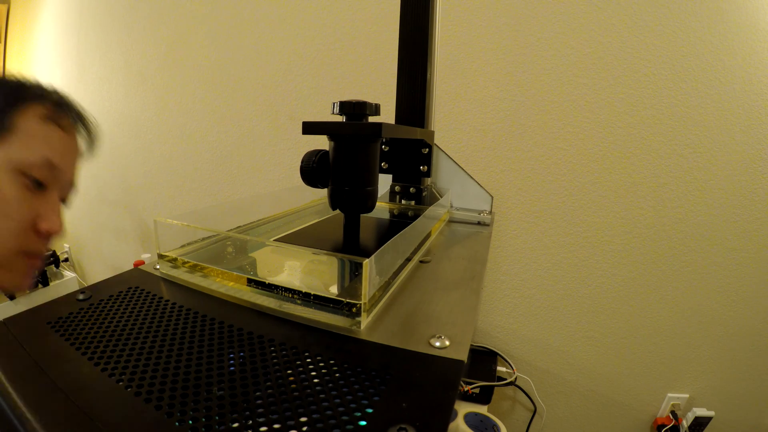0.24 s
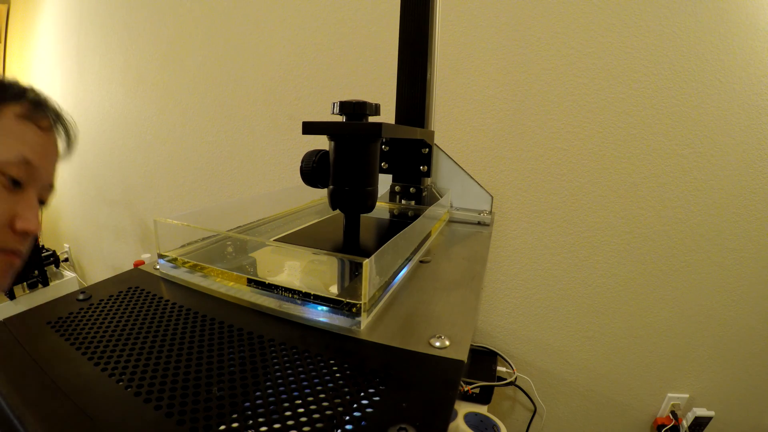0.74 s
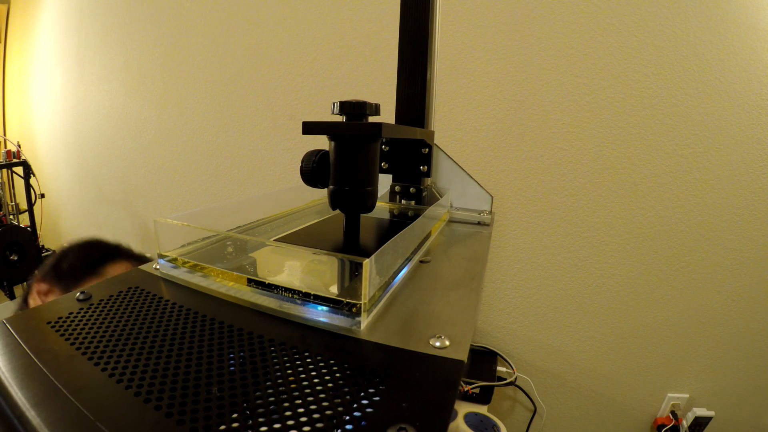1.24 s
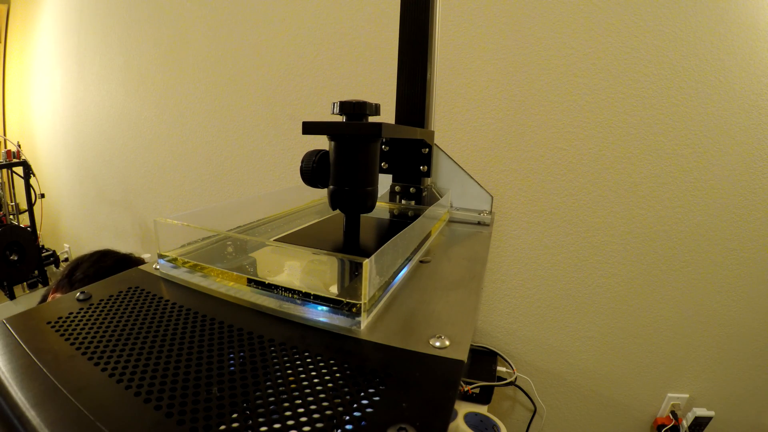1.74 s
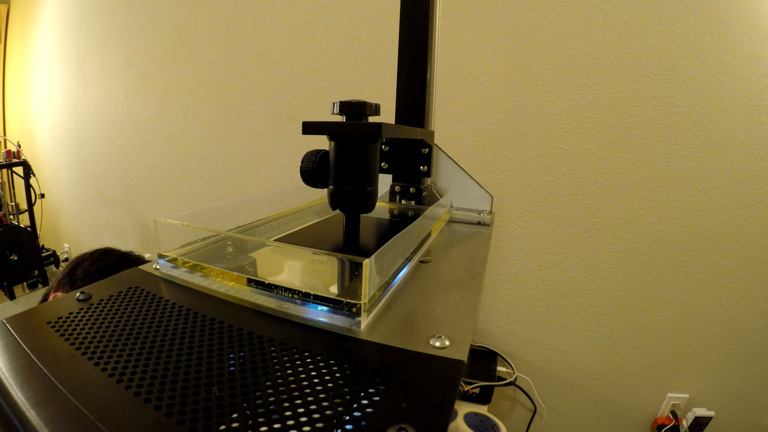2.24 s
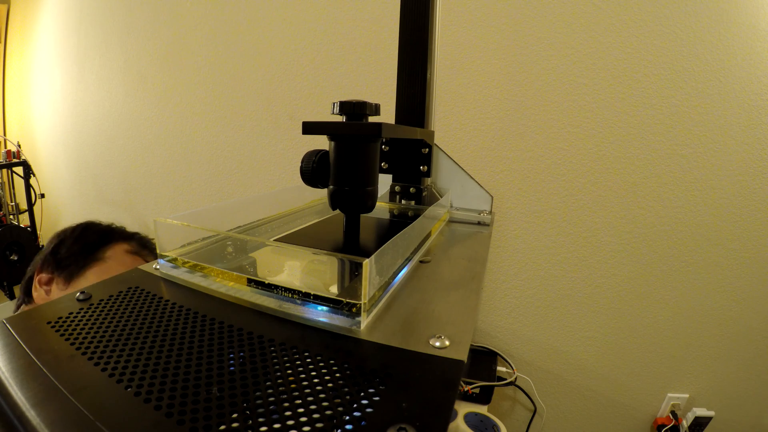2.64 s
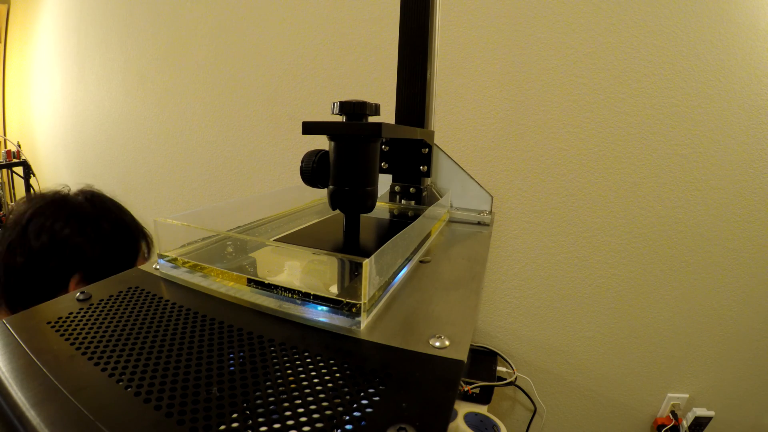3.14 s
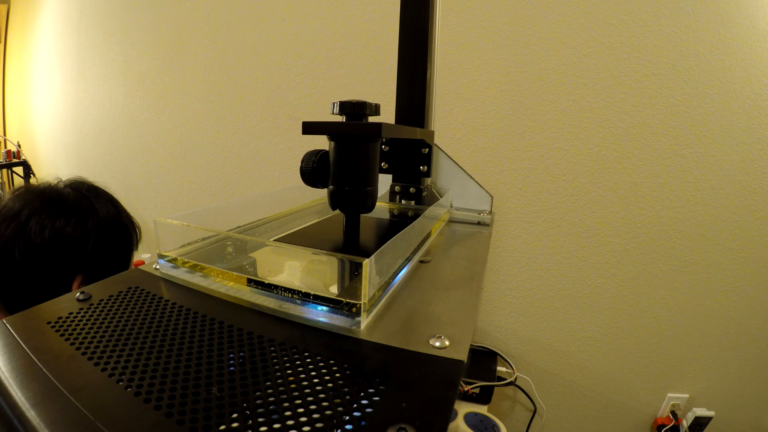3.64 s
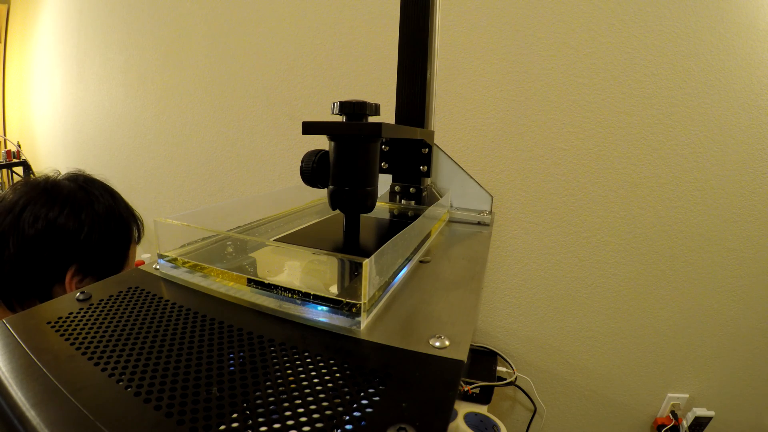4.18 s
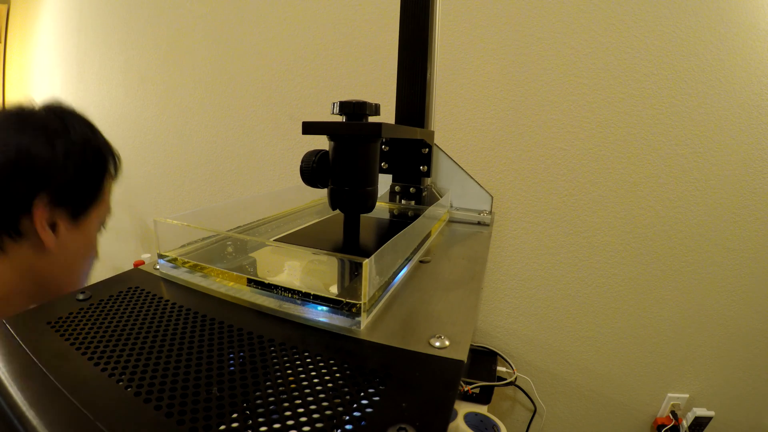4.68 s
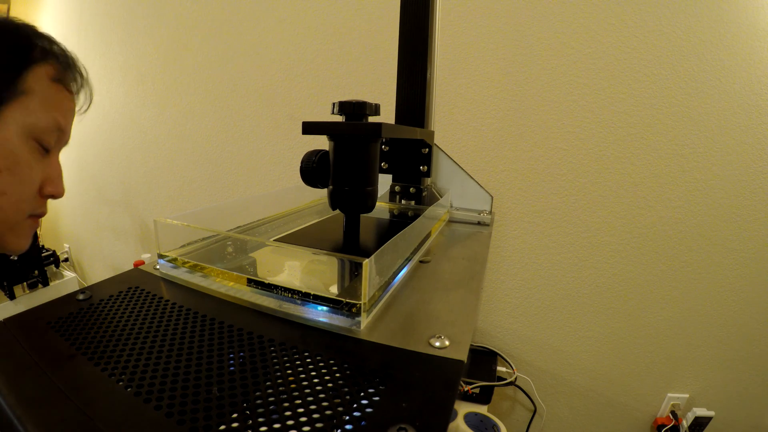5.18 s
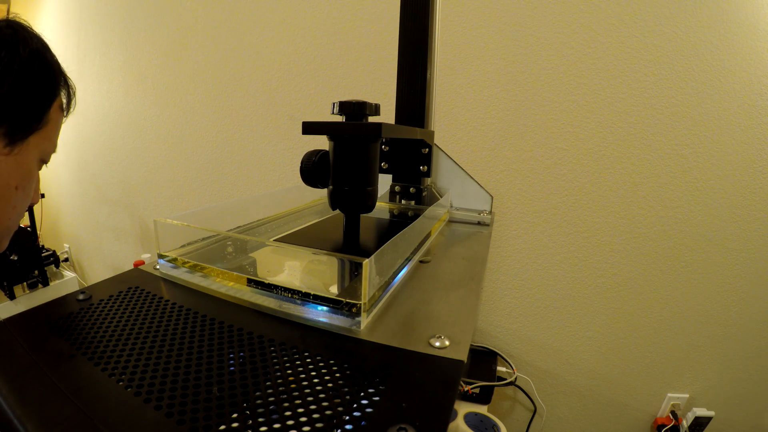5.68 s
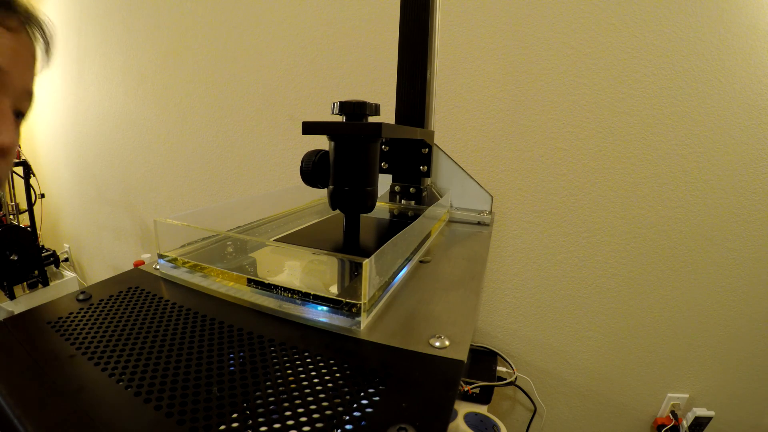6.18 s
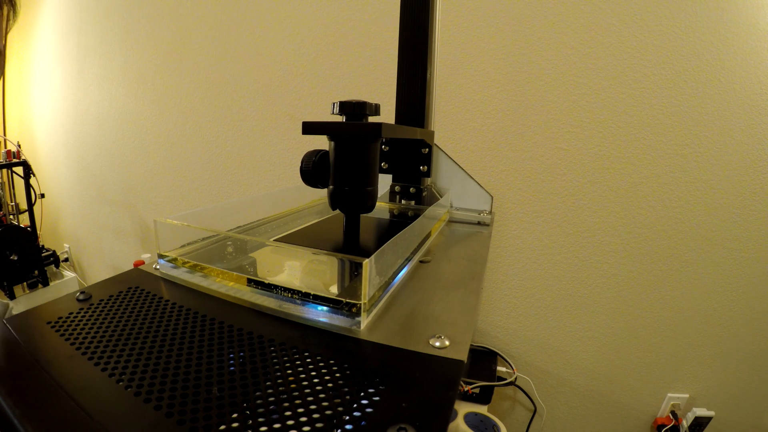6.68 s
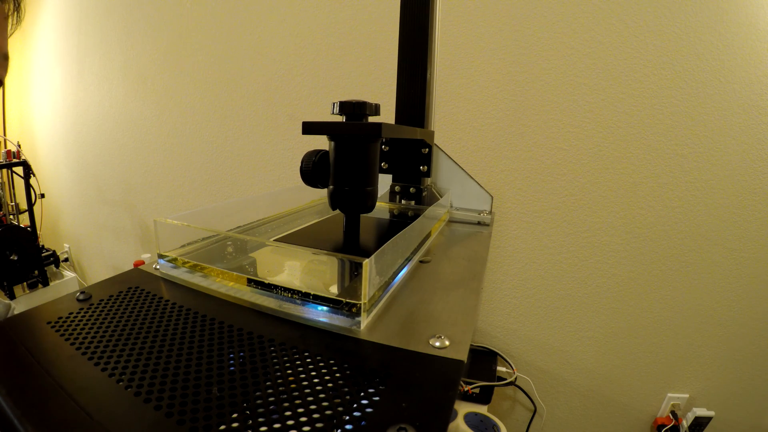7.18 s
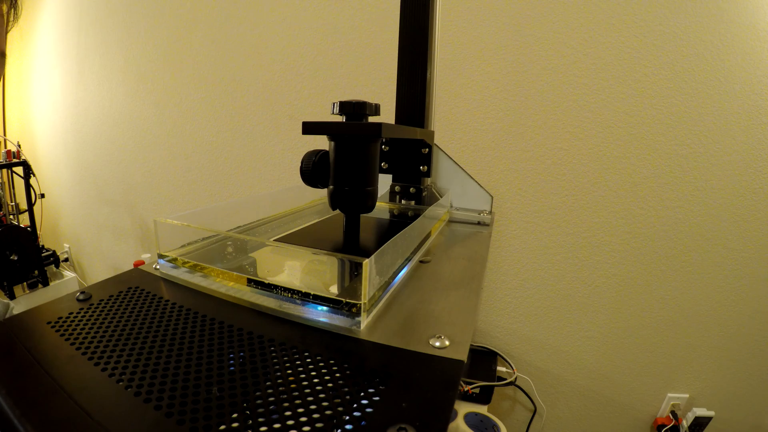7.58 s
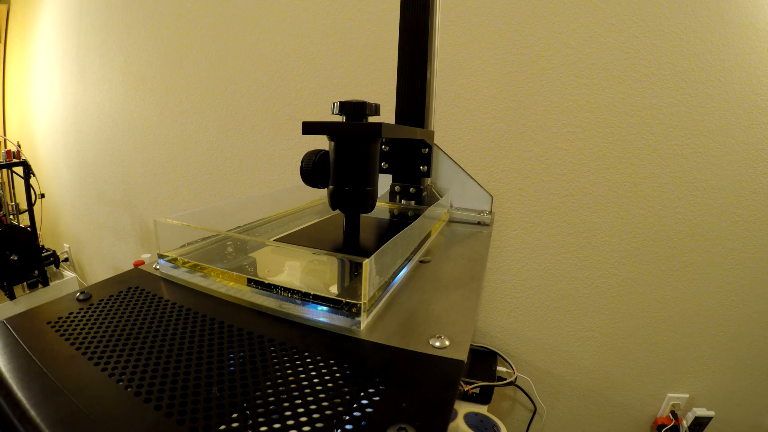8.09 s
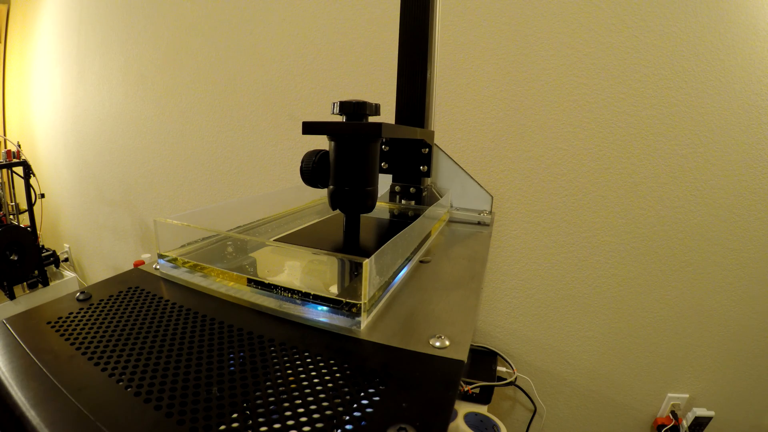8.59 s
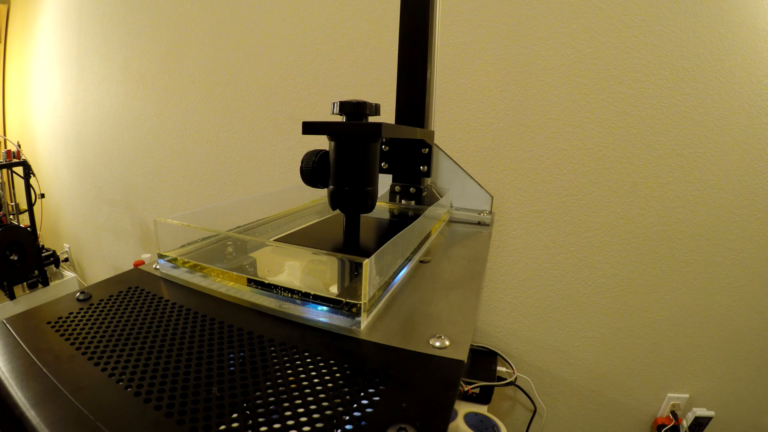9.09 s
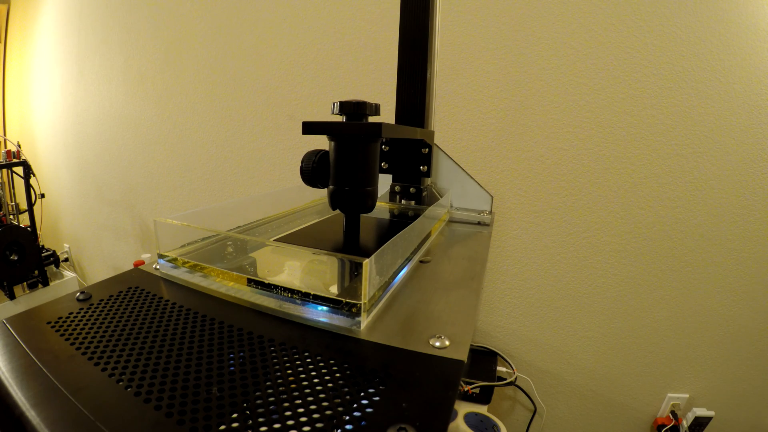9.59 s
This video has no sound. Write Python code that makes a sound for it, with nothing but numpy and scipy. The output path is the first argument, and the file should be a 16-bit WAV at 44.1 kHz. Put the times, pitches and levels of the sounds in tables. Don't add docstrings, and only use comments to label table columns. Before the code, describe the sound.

Throughout about ten seconds, a machine's cooling fans and mains parts hum steadily in a small bare room: a deep low drone, slowly swaying rumble, and a soft rush of air with slight flutter. The microphone is close to the machine. A barely audible sleeve rustle opens the scene. Around 0.4 to 0.7 seconds, a hand rustles and a hollow panel gives faint dull creaks. At 0.7 a nail ticks on a switch, and just before 0.8 it snaps over with a crisp, bright click. A small brush follows near 1.0. At about 1.87 a plastic catch snaps shut, fuller and lower, then knocks and rattles at 2.0 and bounces lightly at 2.16, with soft desk thuds and a quick wall echo. Afterwards only the fans remain, their thin mid tone gently rising, with a very faint brush near 7.9.

```python
import sys
import numpy as np
from scipy import signal
from scipy.fft import rfft, irfft, next_fast_len
from scipy.io import wavfile
from scipy.ndimage import uniform_filter1d

SR = 44100
rng = np.random.default_rng(int(sys.argv[2]) if len(sys.argv) > 2 else 0)


def ratio(d):
    e = np.asarray(d, float) / 20
    return 10 ** e


def transcribe(signal):
    frames = np.atleast_2d(signal).T
    limited = np.clip(frames, -1, 1)
    pcm = np.round(limited * 32767).astype(np.int16)
    wavfile.write(sys.argv[1], SR, pcm)


N = 433503


def rms_one(x):
    return x / np.sqrt(np.mean(x ** 2) + 1e-20)


def drift(rate_hz):
    pole = np.exp(-80 * np.pi * rate_hz / SR)
    coarse = rng.standard_normal(N // 40 + 2002)
    slow = signal.lfilter([1], [1, -2 * pole, pole * pole], coarse)[2000:]
    return np.interp(np.arange(N) / 40, np.arange(len(slow)), rms_one(slow))


def tinted(count, hz, octaves):
    bins = np.maximum(np.arange(count // 2 + 1) * SR / count, 1)
    bell = np.exp(-0.5 * (np.log2(bins / hz) / octaves) ** 2)
    return rms_one(irfft(rfft(rng.standard_normal(count)) * bell, count))


def ring(force, modes):
    out = 0
    for hz, db, t60 in modes:
        radius = ratio(-60 / (t60 * SR))
        angle = 2 * np.pi * hz / SR
        poles = [1, -2 * radius * np.cos(angle), radius * radius]
        out = out + signal.lfilter([0, ratio(db) * np.sin(angle)], poles, force + 1e-18)
    return out


def add(track, s, sound):
    at = round(s * SR)
    track[at:at + len(sound)] += sound


def clicks(events, modes, octaves, contact_s):
    out = np.zeros(N)
    t = np.arange(8192) / SR
    body = ring(1. * (t == 0), modes)
    body = body / np.max(np.abs(body))
    envelope = np.exp(-t / contact_s) * np.minimum(t / 0.0012, 1)
    for s, db, hz, ring_db in events:
        grit = tinted(len(t), hz, octaves) * envelope
        add(out, s, ratio(db) * (ratio(-8.5) * grit + ratio(ring_db) * body))
    return out


def hum():
    tones_hz = [119.96, 239.92, 599.8, 1679.4, 40.72, 44.0, 115.5, 389, 705, 644.5, 920, 1104.2, 1288.2]
    # level/dB rms, level wander/dB, phase wander/rad
    tone_levels = [(-23.5, 0.43, 0.21), (-52.5, 2.1, 0.18), (-69.5, 2, 0.66), (-69, 1.5, 0.65),
                   (-29.5, 0.14, 0.32), (-40, 1, 0.79), (-52, -2, 0.71), (-65.5, 6.5, 1.85),
                   (-62.5, -1.5, 1.6), (-62.5, 3, 1.6), (-66.5, 1, 0.93), (-59, -1.5, 0.64), (-67, 0, 0.76)]
    t = np.arange(N) / SR
    out = np.zeros(N)
    for hz, (db, wander_db, wander_rad) in zip(tones_hz, tone_levels):
        loudness = np.sqrt(2) * ratio(db + wander_db * drift(0.89))
        phase = 2 * np.pi * (hz * t + rng.random()) + wander_rad * drift(0.8)
        out += loudness * np.sin(phase)
    return out


def blade_tone():
    # t/s, level/dB
    shadow = [
        (0.0, -48),
        (2.0, -51.5),
        (2.5, -51),
        (4.4, -50.5),
        (5.75, -48.5),
        (9.83, -47),
    ]
    blade_hz, wander_db = 322.0, 1.56
    t = np.arange(N) / SR
    s, db = np.transpose(shadow)
    loudness = np.sqrt(2) * ratio(np.interp(t, s, db) + 1.47 + wander_db * drift(1.9))
    return loudness * np.sin(2 * np.pi * blade_hz * t + 0.74 * drift(1.0))


def switch():
    # t/s, peak level/dB, brightest f/Hz, ring level/dB
    tick_hits = [
        (.6906, -23.5, 2600, -4.5),
    ]
    # f/Hz, level/dB, t60/s
    tick_modes = [(1500, -9, 0.028), (1970, -3, 0.029), (2400, -3, .02), (3000, -5, 0.055),
                  (3500, -24, .015), (8800, -29, 0.07)]
    # t/s, peak level/dB, brightest f/Hz, ring level/dB
    switch_hits = [
        (.771, -30, 3000, -12),
        (.7795, -19.5, 4240, -1.5),
        (.7825, -18.5, 4270, 0.5),
        (.786, -19.5, 4300, -1.5),
    ]
    # f/Hz, level/dB, t60/s
    switch_modes = [(750, -8, 0.036), (1500, 0, 0.017), (2010, -10, 0.022), (2460, 1, .025),
                    (3650, -2, 0.014), (4080, 4, 0.014), (4530, -7, 0.019), (6950, -8, 0.024),
                    (8940, -11, 0.17), (9130, -25, .12), (11100, -14, .02)]
    tick = clicks(tick_hits, tick_modes, octaves=0.51, contact_s=0.003)
    return tick + clicks(switch_hits, switch_modes, octaves=0.87, contact_s=0.004)


def catch():
    # t/s, peak level/dB, brightest f/Hz, ring level/dB
    snap_hits = [
        (1.846, -35, 2000, -2),
        (1.870, -17.5, 1100, 1),
        (1.874, -18, 885, -1),
        (1.880, -19.5, 990, -19),
        (1.914, -30, 4200, -9),
    ]
    rattle_hits = [
        (1.987, -28, 895, -11),
        (1.992, -27.5, 900, 3),
        (1.998, -31.5, 2200, 1.5),
    ]
    bounce_hits = [
        (1.671, -37, 1900, 0),
        (2.158, -23.5, 2400, -3.5),
        (2.167, -36, 4030, -6),
    ]
    # f/Hz, level/dB, t60/s
    snap_modes = [(487, 0, 0.045), (700, 3.5, 0.032), (970, -2, 0.025), (1170, 4, 0.033),
                  (1270, -11, 0.033), (2160, -2, 0.039), (2580, 1, 0.023), (4200, -15, .1),
                  (5380, -6, 0.017), (8250, -19, 0.06), (12750, -24, 0.17)]
    rattle_modes = [(754, 6, 0.033), (980, 0, 0.031), (1270, 3, 0.032), (2130, 0, 0.027), (2600, -8, .03),
                    (4200, -8, .05), (4380, -15, .04), (5840, -20, .03)]
    bounce_modes = [(1410, 3, .04), (1750, -13, 0.025), (2060, 5, 0.024), (2500, -2, 0.023),
                    (3900, -7, .045), (4750, -10, 0.03), (5600, -18, .03), (7060, -14, .03)]
    snap = clicks(snap_hits, snap_modes, octaves=1.33, contact_s=0.004)
    rattle = clicks(rattle_hits, rattle_modes, octaves=1.02, contact_s=0.0069)
    bounce = clicks(bounce_hits, bounce_modes, octaves=1.1, contact_s=0.0029)
    return snap + rattle + bounce


def desk_thuds():
    # t/s, peak level/dB
    thuds = [
        (.48, -39),
        (.79, -36),
        (1.872, -48),
        (1.995, -28),
        (2.02, -34),
        (2.16, -33.5),
        (2.24, -39),
    ]
    # f/Hz, level/dB, t60/s
    desk_modes = [(197.4, 0.5, 0.49), (190, -7, 0.1), (292, 2.5, 0.3)]
    force = np.zeros(N)
    push = np.hanning(round(0.004 * SR))
    for s, db in thuds:
        add(force, s, ratio(db) * push / push.sum())
    return ring(force, desk_modes)


def panel_creaks():
    # t/s, peak level/dB, f/Hz
    knocks = [
        (.458, -31, 680),
        (.460, -36, 577),
        (0.49, -39, 605),
        (0.512, -39, 630),
        (0.533, -29, 578),
        (.536, -32.5, 700),
        (.557, -38, 580),
    ]
    slip_cycles = 13.0
    out = np.zeros(N)
    for s, db, hz in knocks:
        t = np.arange(round(slip_cycles / hz * SR)) / SR
        add(out, s, ratio(db) * np.hanning(len(t)) * np.sin(2 * np.pi * hz * t))
    return out


def rustles():
    # start t/s, length/s, level/dB rms, brightest f/Hz, spread/octaves
    strokes = [
        (0.018, 0.17, -60, 3500, 0.63),
        (0.41, .025, -59, 12100, .12),
        (0.4, 0.46, -58.5, 2500, 0.91),
        (0.586, 0.0074, -56, 9500, .3),
        (0.593, .03, -61, 5960, 1),
        (0.625, 0.043, -50.5, 4800, 0.81),
        (0.97, 0.018, -51.5, 1990, 0.57),
        (7.919, .05, -56, 2500, 0.93),
    ]
    out = np.zeros(N)
    for s, length, db, hz, octaves in strokes:
        noise = tinted(8192 * 2, hz, octaves)[:round(length * SR)]
        add(out, s, ratio(db) * noise * np.hanning(len(noise)) ** 0.5)
    return out * ratio(3.9 * drift(60))


def air(points):
    # f/Hz, width/Hz, lift/dB
    case_peaks = [(48, 8.2, 1.5), (119, 15, 7.5), (148, 19, 7.5), (201.4, 6.6, 5.5), (434.3, 24, 6),
                  (561, 22, 5.5), (920, 24, -0.5), (1070, 41, 5.5), (1330, 24, -2.5), (1425, 110, 2.5),
                  (2500, 94, 0.5), (12400, 3400, 0.6)]
    size = next_fast_len(N, True)
    hz = np.maximum(np.arange(size // 2 + 1) * SR / size, 1)
    point_hz, point_db = np.transpose(points)
    db = np.interp(np.log(hz), np.log(point_hz), point_db, left=-140, right=-140)
    for top, width, lift in case_peaks:
        db = db + lift / (1 + (2 * (hz - top) / width) ** 2)
    return irfft(rfft(rng.standard_normal(size)) * ratio(db) * np.sqrt(SR / 2), size)[:N]


def airflow():
    # f/Hz, level/dB per Hz
    rumble = [(5, -74), (16, -65), (27, -58), (50, -52), (78, -65.5), (105, -66.5), (175, -72), (350, -71)]
    # f/Hz, level/dB per Hz
    rush = [(350, -73), (420, -75), (750, -77), (900, -82), (2500, -88.5), (2800, -91.5), (8000, -101),
            (15500, -107)]
    swaying = air(rumble) * ratio(0.7 * drift(0.69))
    return swaying + air(rush) * ratio(0.18 * drift(1.0) + 0.5 * drift(28))


def room(x, wall_db, tail_db):
    wall_s, t60_s = 0.0215, 0.31
    t = np.arange(round(0.5 * SR)) / SR
    lows = signal.lfilter([0.5], [1, -0.6], rng.standard_normal(len(t)))
    highs = rng.standard_normal(len(t))
    tail = lows * ratio(-60 * t / t60_s) + highs * ratio(-90 * t / t60_s)
    tail = tail * np.minimum(t / 0.006, 1)
    answer = ratio(tail_db) * tail / np.sqrt(np.sum(tail ** 2))
    answer[round(wall_s * SR)] += ratio(wall_db)
    return x + signal.fftconvolve(x, answer)[:N]


def scene():
    machine = hum() + blade_tone() + airflow()
    handled = room(switch() + rustles(), wall_db=-10, tail_db=-3.0)
    handled = handled + room(catch(), wall_db=-3.5, tail_db=-3.5)
    desk = room(panel_creaks(), wall_db=-40, tail_db=-11) + desk_thuds()
    return (machine + handled + desk)[None]


def pips(count, db):
    out = np.zeros(N + 512)
    t = np.arange(256) / SR
    for at, pitch, size in rng.random((count, 3)):
        hz = 13000 + 1600 * np.sqrt(pitch)
        add(out, at * N / SR, ratio(db + 10 * size) * np.hanning(256) * np.sin(2 * np.pi * hz * t))
    return out[:N]


def band_limit(x):
    return signal.sosfilt(signal.butter(12, 15370, fs=SR, output="sos"), x)


def record(dry):
    edges_hz = [12700, 13050, 13700, 14500, 14950, 15300]
    reserves = [.9, .35, .35, .25, -.3]
    dropouts_hz = 6.5
    size = next_fast_len(N, True)
    hz = np.arange(size // 2 + 1) * SR / size
    spectrum = rfft(dry[0], size) * (hz < edges_hz[-1])
    treble = irfft(spectrum * (hz > edges_hz[0]), size)[:N]
    power = uniform_filter1d(treble ** 2, size=2048)
    rhythm = np.sin(2 * np.pi * dropouts_hz * np.arange(N) / SR + 1.3 * drift(2.5)) + 0.6 * drift(14)
    rhythm = np.where(power < 3 * np.median(power), rhythm, -9)
    pips_on = uniform_filter1d(1. * (rhythm > 0.3), size=256)
    thinned = irfft(spectrum, size)[:N] + pips_on * pips(count=600, db=-67.5)
    for low, high, reserve in zip(edges_hz, edges_hz[1:], reserves):
        band = irfft(spectrum * (hz > low) * (hz <= high), size)[:N]
        gone = uniform_filter1d(1. * (rhythm + 0.3 * drift(25) > reserve), size=256)
        thinned = thinned - gone * band
    return band_limit(thinned[None])


dry = scene()
out = record(dry)
transcribe(out)
```